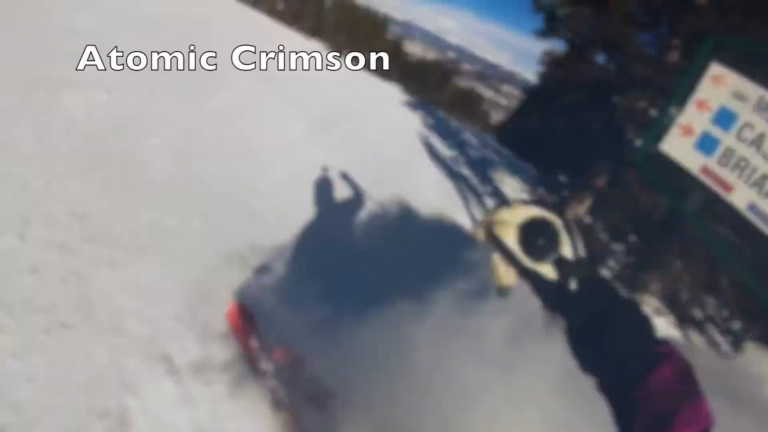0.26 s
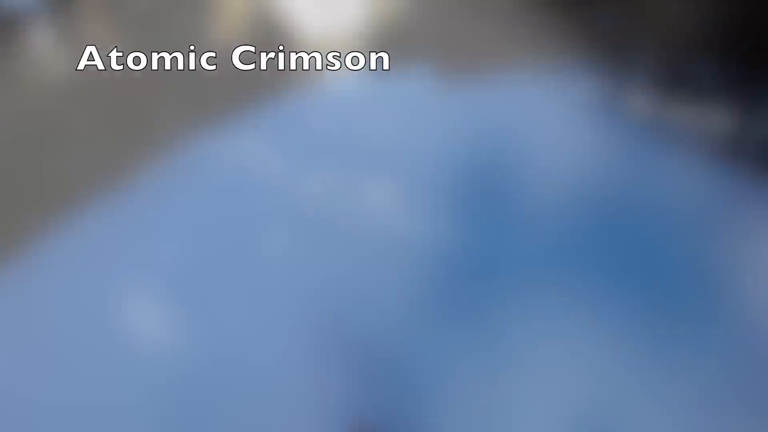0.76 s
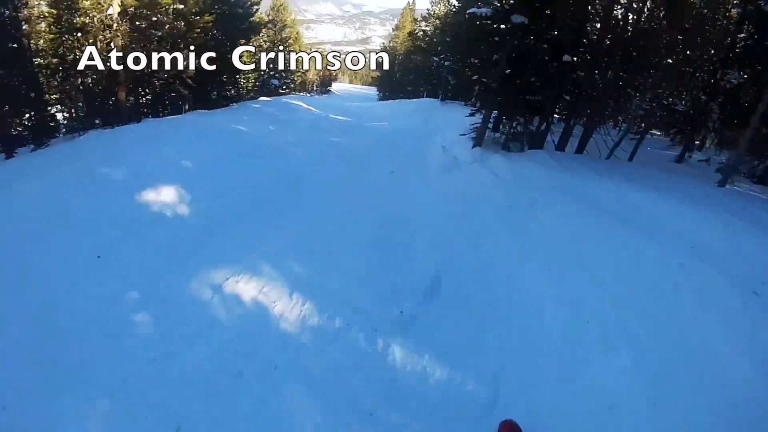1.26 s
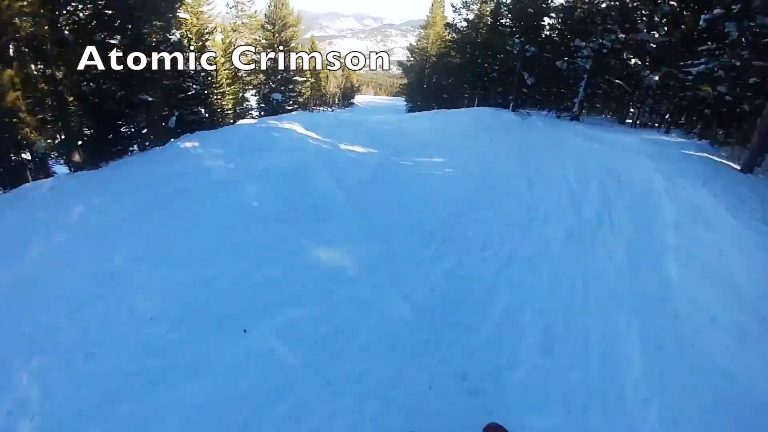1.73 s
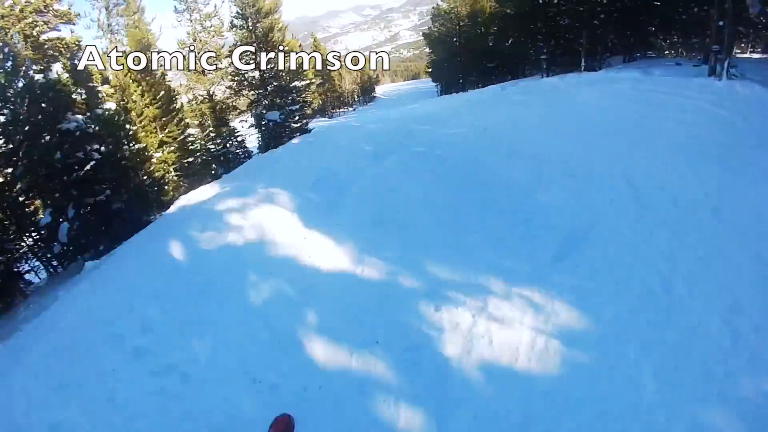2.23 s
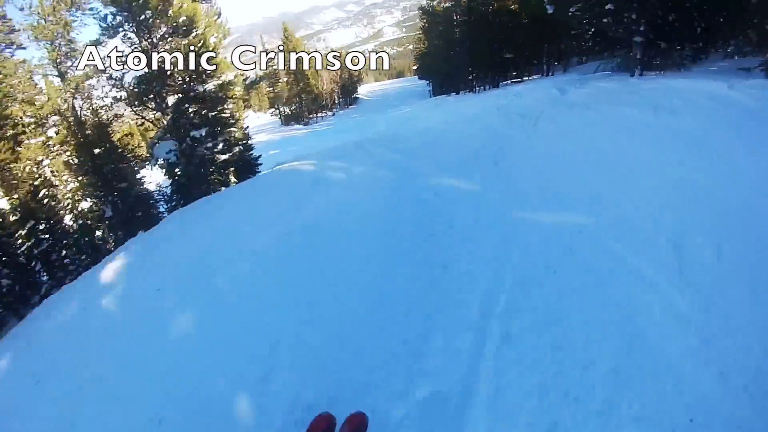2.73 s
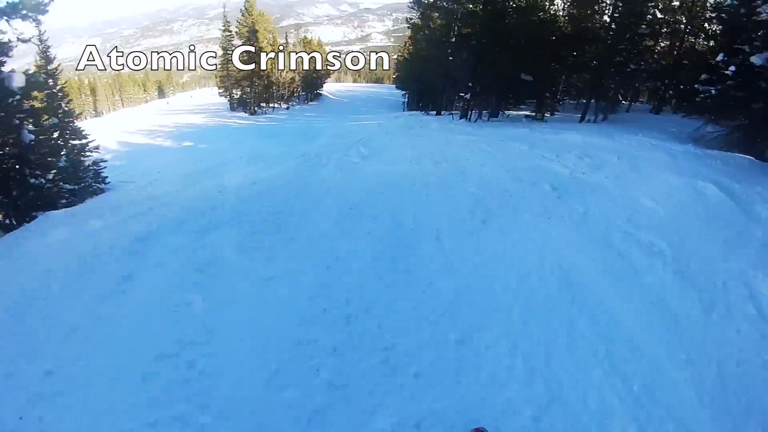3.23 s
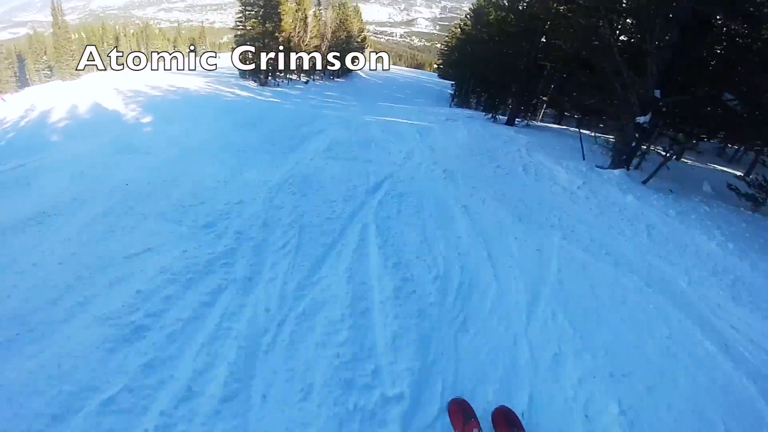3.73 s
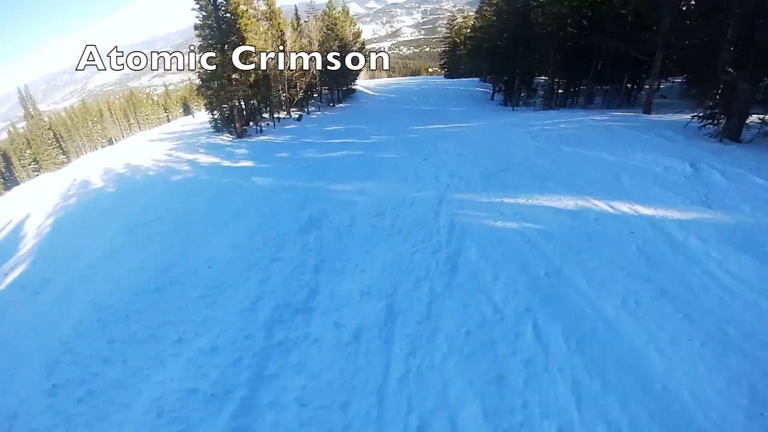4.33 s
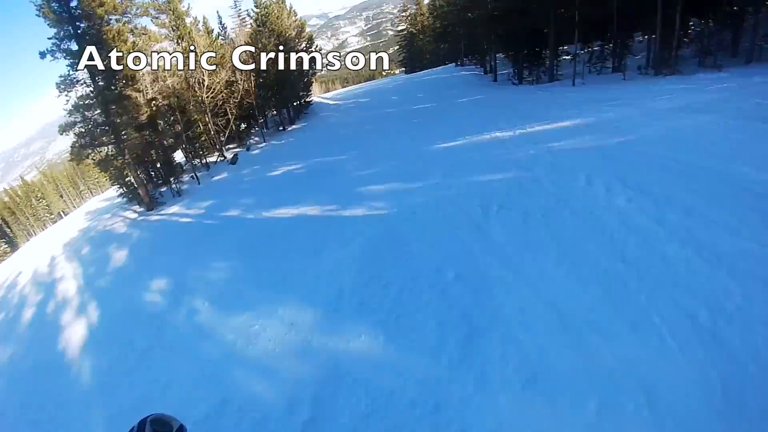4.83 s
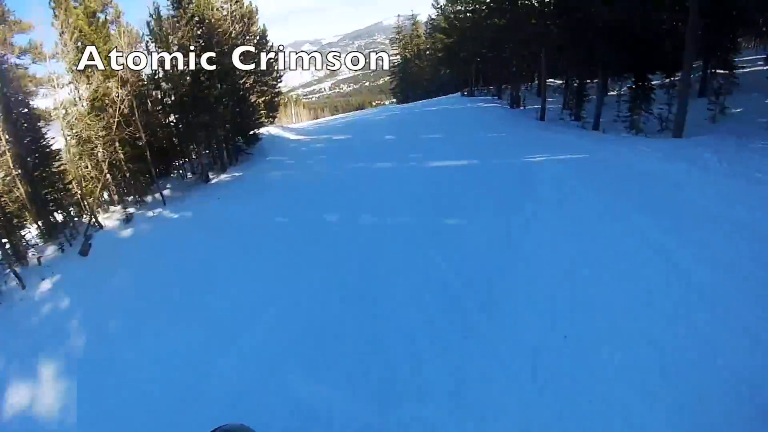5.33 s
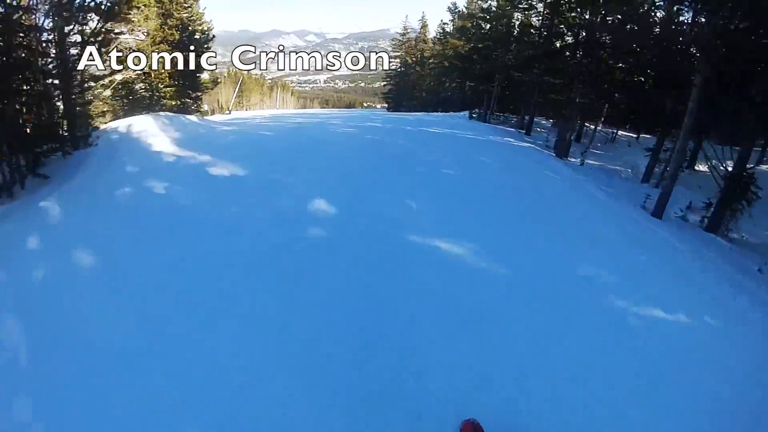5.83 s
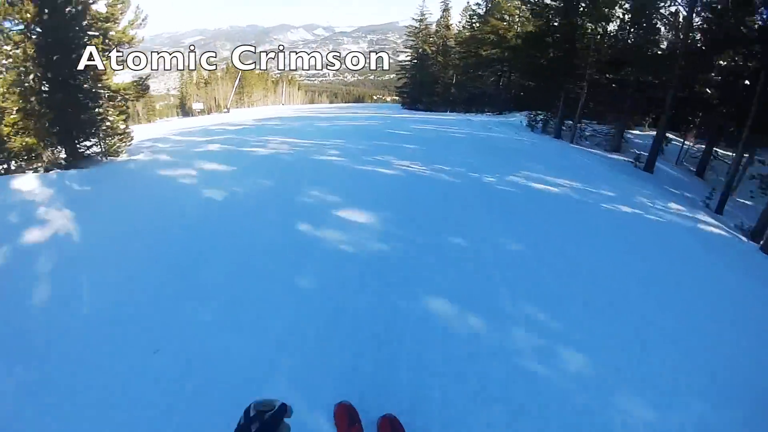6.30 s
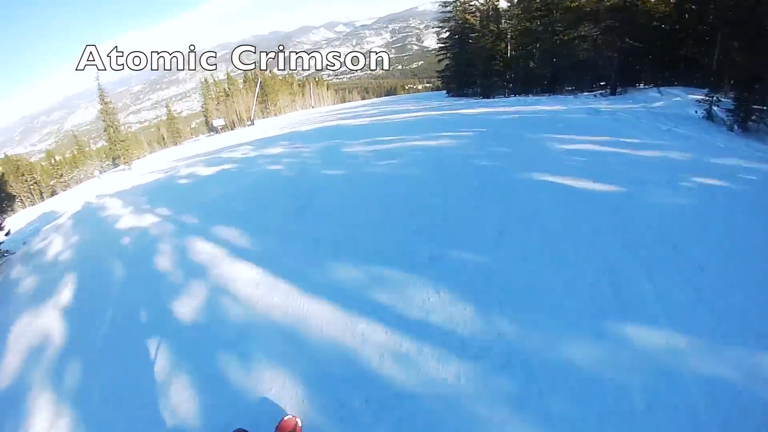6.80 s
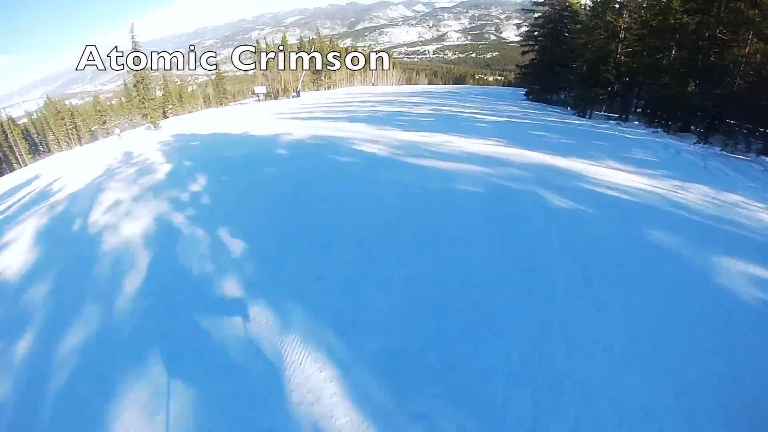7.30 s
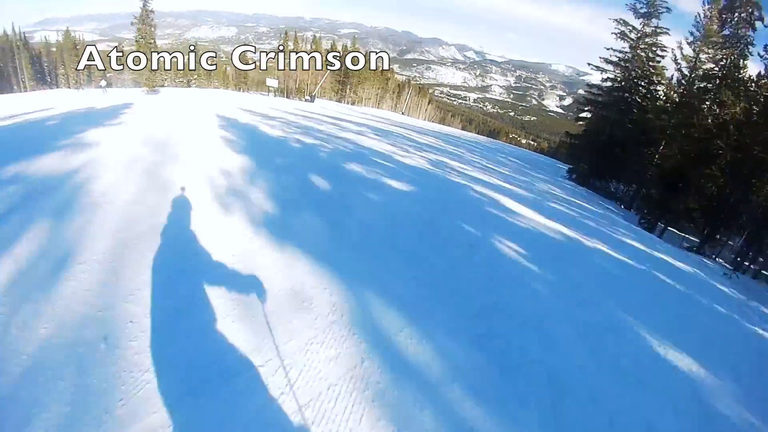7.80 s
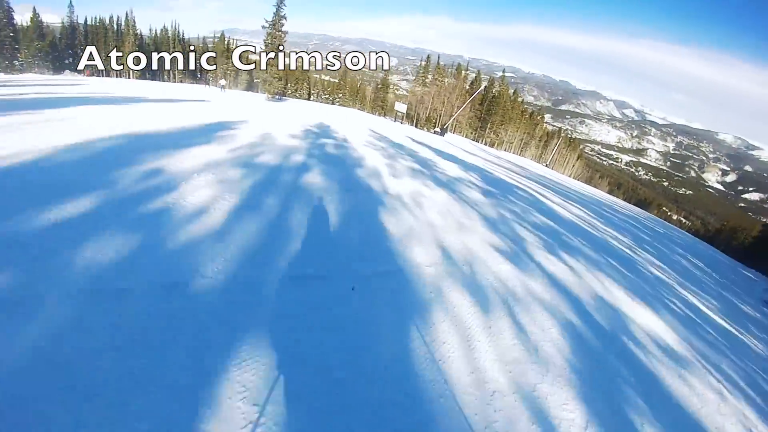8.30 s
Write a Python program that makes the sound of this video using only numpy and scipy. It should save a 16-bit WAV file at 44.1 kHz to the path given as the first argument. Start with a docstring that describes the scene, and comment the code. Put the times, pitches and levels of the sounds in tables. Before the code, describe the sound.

Skis hiss and scrape over packed snow while wind rumbles and flutters on an enclosed camera, with sharp plastic knocks and dull bumps.

```python
"""Skis hiss and bite on packed snow, heard by a camera in a closed plastic housing: coloured noise shaped by
the housing's resonances and driven by the pace of the run. Wind is slow noise that rumbles, flutters and
faintly whistles. Small lumps tap as short ringing thumps. Bumps swing the housing; it knocks in its mount with
clicks and ringing thuds, and plastic snaps; a lone tap sounds late in the run. Loud peaks push the recorder's
limiter down for a moment; a faint background noise lies under it all."""
import sys
import numpy as np
from scipy import signal
from scipy.fft import rfft, irfft
from scipy.io import wavfile

SR = 44100
rng = np.random.default_rng(int(sys.argv[2]) if len(sys.argv) > 2 else 0)


def materialize(psi):
    """Save the field psi as 16-bit PCM at rate SR to the path in sys.argv[1].

    A 1-D psi becomes a single channel; in a 2-D psi each row is a channel.
    """
    bounded = np.clip(np.atleast_2d(psi).T, -1, 1)
    quanta = np.round(bounded * 32767).astype(np.int16)
    wavfile.write(sys.argv[1], SR, quanta)


N = 377055
TIME = np.arange(N) / SR  # seconds
BIN_HZ = np.maximum(np.arange(N // 2 + 1) * SR / N, 1)  # frequencies of the spectrum


def from_db(db):
    """Turn decibels into a gain."""
    return 10 ** (np.asarray(db) / 20)


def colour(points):
    """Draw a spectrum in dB through a few points, straight on a log frequency scale."""
    hz, db = np.transpose(points)
    return np.interp(np.log(BIN_HZ), np.log(hz), db)


def noise(gain, band=slice(None)):
    """Filter white noise to the given spectrum, with rms 1 inside the band."""
    power = np.sum(gain[band] ** 2) / len(gain)
    spectrum = rfft(rng.standard_normal(N)) * gain / np.sqrt(power)
    return irfft(spectrum, N)


def drift(rate_hz):
    """Wander at random around zero with rms 1, mostly slower than the given rate."""
    return noise(1 / (1 + (BIN_HZ / rate_hz) ** 2))


def ring(force, hz, t60):
    """Let a force strike a resonance: a unit click starts a sine of height 1 that dies 60 dB in t60 s."""
    radius = from_db(-60 / (t60 * SR))
    angle = 2 * np.pi * hz / SR
    # the tiny offset keeps the filter from running on vanishing numbers
    return signal.lfilter([0, np.sin(angle)], [1, -2 * radius * np.cos(angle), radius ** 2], force + 1e-18)


def clicks(times, db):
    """Place one-sample clicks of the given heights."""
    out = np.zeros(N)
    out[(np.asarray(times) * SR).astype(int)] = from_db(db)
    return out


def swing(s, hz):
    """Make one quick swing out and back, of height 1 at time s."""
    phase = np.minimum((np.pi * hz * (TIME - s)) ** 2, 50)
    return (1 - 2 * phase) * np.exp(-phase)


def swells(rows):
    """Add smooth rises and falls, each given by its middle, length and height."""
    total = np.zeros(N)
    for s, length, height in rows:
        total += height * np.cos(np.pi * np.clip((TIME - s) / length, -.5, .5)) ** 2
    return total


# pace of the run, which drives skis, wind and lumps: (time [s], level [dB above cruising])
PACE = [(0, -14), (0.45, -16.5), (0.8, -8), (1.1, 0), (1.5, -1), (1.9, -0.5), (2.47, 4), (2.65, 1),
        (3.55, 2.5), (4.05, 1), (4.55, 3.5), (5.3, 3), (5.65, -0.94), (6.52, -4.5), (6.85, 1.2), (8.2, -3),
        (8.55, -1)]


def pace_of_run():
    """Join the pace points by straight lines; each source follows them in its own measure."""
    s, db = np.transpose(PACE)
    return np.interp(TIME, s, db)


# colour of the faint background noise: (frequency [Hz], relative level [dB per Hz])
BACKGROUND_COLOUR = [(20, 6), (125, -15), (500, -20.5), (2000, -34), (8000, -35), (15000, -20.5)]


def background_noise(level_db=-67.5):
    """Make a faint background noise, drawn separately for each channel."""
    pair = np.array([noise(from_db(colour(BACKGROUND_COLOUR))) for channel in range(2)])
    return from_db(level_db) * pair


SWAY_DB, SWAY_S = -17, 0.11  # rumble around a bump of 0 dB; time over which it builds and dies


def sway():
    """Build and let die the camera's swaying around every jolt and knock, adding their powers."""
    power = np.zeros(N)
    for s, db, *_ in JOLTS + KNOCKS:
        power += from_db(db) ** 2 * np.exp(-2 * np.abs(TIME - s) / SWAY_S)
    return np.sqrt(power)


# colour of the deep wind rumble: (frequency [Hz], relative level [dB per Hz])
RUMBLE_COLOUR = [(8, -5.5), (18, 0), (35, -2.5), (55, -5), (80, -15), (120, -20), (250, -40.5),
                 (600, -74.5)]
# colour of the flutter of the shaken housing: (frequency [Hz], relative level [dB per Hz])
FLUTTER_COLOUR = [(40, -11.5), (90, -18), (140, -1), (195, 3.5), (250, -5.5), (330, -20), (430, -25.5),
                  (700, -35), (2000, -88)]
# gusts and lulls in the headwind: (middle time [s], length [s], change of rumble level [dB])
GUSTS = [(.6, 0.47, 3), (3.22, 0.21, 3.5), (4.2, 0.84, -2.5), (6.2, 1.36, -0.5), (6.95, 0.48, 5),
         (7.3, 0.44, -4.5), (8.55, 0.64, 4.5)]
# swell of the faint edge whistle: (middle time [s], length [s], added level [dB])
WHISTLE_SWELL = [(7.66, 1, 18)]
# levels at cruising pace, before gusts; FOLLOWS is dB per dB of pace
RUMBLE_DB, RUMBLE_FOLLOWS = -25, 0.76
FLUTTER_DB, FLUTTER_FOLLOWS = -36.5, 1
FLUTTER_SHARE = 0.28  # part of each gust that the flutter takes up
WHISTLE_DB, WHISTLE_HZ, WHISTLE_WIDTH_HZ = -70.5, 839, 12


def wind(gust_db=2.0, lumpy_db=0.5):
    """Eddies press on the housing, shake it on its mount and whistle faintly at an edge."""
    pace = pace_of_run()
    gusts = swells(GUSTS)
    quick_gusts = gust_db * drift(15.0)

    air_rumble = from_db(RUMBLE_DB + RUMBLE_FOLLOWS * pace + gusts)
    rumble_level = np.hypot(air_rumble, from_db(SWAY_DB) * sway())
    rumble = noise(from_db(colour(RUMBLE_COLOUR))) * rumble_level * from_db(quick_gusts)

    flutter_db = FLUTTER_DB + FLUTTER_FOLLOWS * pace + FLUTTER_SHARE * gusts
    flutter_db = flutter_db + quick_gusts + lumpy_db * drift(30)
    flutter = noise(from_db(colour(FLUTTER_COLOUR))) * from_db(flutter_db)

    narrow = 1 / (1 + ((BIN_HZ - WHISTLE_HZ) / WHISTLE_WIDTH_HZ) ** 2)
    whistle = noise(narrow) * from_db(WHISTLE_DB + pace + swells(WHISTLE_SWELL))
    return rumble + flutter + whistle


LUMPS_PER_S, LUMP_SPREAD_DB = 22, 3.5
LUMP_DB, LUMP_FOLLOWS = -34.5, 1.5  # click level at cruising pace; dB per dB of pace
# what a lump sets ringing: (frequency [Hz], level [dB], time to fall 60 dB [s])
LUMP_MODES = [(116.4, 0.5, 0.046), (220, -1.5, 0.024), (492, -20, 0.055)]
# stretches of chopped snow: (middle time [s], length [s], added level of the lumps [dB])
ROUGH_SNOW = [(2.25, 1.5, 11), (4.85, 1.7, 1)]


def lumps():
    """Lumps of snow tap the skis at random and reach the mount as soft thumps, stronger at speed."""
    times = TIME[rng.random(N) < LUMPS_PER_S / SR]
    level = LUMP_DB + LUMP_FOLLOWS * pace_of_run() + swells(ROUGH_SNOW)
    chance = np.clip(rng.standard_normal(len(times)), -2, 2)
    size_db = np.interp(times, TIME, level) + LUMP_SPREAD_DB * chance
    soften = signal.butter(2, 700, fs=SR, output="sos")
    force = signal.sosfilt(soften, clicks(times, size_db))
    return sum(from_db(db) * ring(force, hz, t60) for hz, db, t60 in LUMP_MODES)


# soft jolts from bumps in the slope: (time [s], peak level [dB])
JOLTS = [(1.491, -15), (1.552, -5.5), (1.777, 2), (2.342, -2.5), (2.496, 2), (2.833, -7), (2.897, -11),
         (3.134, -10), (3.702, -5.5), (4.183, -5), (4.599, -5), (4.685, -0.5), (5.244, -2.5), (5.438, 0.5)]
JOLT_HZ = 55
LEAD_S, LEAD_HZ, LEAD_DB = .011, 71.2, -12  # swing before each knock; dB relative to its tabled thud


def jolts():
    """A bump swings the housing once out and back; a like swing leads into every knock."""
    soft = sum(from_db(db) * swing(s, JOLT_HZ) for s, db in JOLTS)
    leading = sum(from_db(thud + LEAD_DB) * swing(s - LEAD_S, LEAD_HZ) for s, thud, _ in KNOCKS)
    return -(soft + leading)


# the housing hits the end of its play: (time [s], thud level [dB], click level [dB]), before the trims
KNOCKS = [(0.0627, 2, -15), (0.172, -1.5, -19), (.274, -0.5, -19.5), (.388, -8.5, -28), (0.79, -22, -57),
          (1.578, 2, -15), (1.703, 3, -18.5), (1.8, -0.5, -44), (1.936, -4, -26), (2.348, -0.5, -25),
          (2.627, -15.5, -38), (2.724, -8, -34), (3.701, -11, -27), (3.927, -12, -42), (4.176, -15, -31),
          (4.509, -3, -25.5), (4.691, 1.5, -26), (5.2918, 9, -7), (5.421, -7, -24), (5.5, -2, -24),
          (6.4002, -7.5, -30.5)]
# ringing of the housing on its mount: (frequency [Hz], level [dB], time to fall 60 dB [s])
MOUNT_MODES = [(201, 0, 0.047), (50.6, -14.5, 0.17)]
# ringing of the housing's shell: (frequency [Hz], level [dB], time to fall 60 dB [s])
SHELL_MODES = [(494, -8, 0.031), (1304, -3, 0.021), (2038, 1.5, 0.01), (2608, -8.5, 0.014),
               (4730, -17.5, 0.0036), (6800, -27, 0.0011)]
THUD_TRIM_DB, CLICK_TRIM_DB = -1.5, -2.0
THUD_HZ, STIFFEN_HZ_PER_DB = 180, 3  # rebound for a tabled thud of 0 dB; harder knocks rebound faster


def knocks(rebound_s=0.0031, grit_t60=0.019, grit=0.091):
    """The mount stops the housing: a gritty click in the shell, then a padded rebound that rings on."""
    s, thud, click = np.transpose(KNOCKS)
    push = np.zeros(N)
    for at, db in zip(s, thud):
        push -= from_db(db + THUD_TRIM_DB) * swing(at + rebound_s, THUD_HZ + STIFFEN_HZ_PER_DB * db)
    # the push, summed over its length, sets the mount ringing
    drive = push * np.pi * THUD_HZ / SR
    body = push + sum(from_db(db) * ring(drive, hz, t60) for hz, db, t60 in MOUNT_MODES)

    touch = clicks(s, click + CLICK_TRIM_DB)
    # each click leaves a dying tail of rough noise
    rub = signal.lfilter([1], [1, -from_db(-60 / (grit_t60 * SR))], touch + 1e-18)
    force = touch + grit * rub * rng.standard_normal(N)
    shell = np.zeros(N)
    for k, (hz, db, t60) in enumerate(SHELL_MODES):
        shell += (-1) ** k * from_db(db) * ring(force, hz, t60)  # neighbours start in opposite directions
    return body + shell


RATTLE_S, RATTLE_HZ, RATTLE_T60_S = .0295, 3200, 0.014  # delay after the knock, pitch, decay
# level after the hardest click, before the band filter; dB per dB of click
RATTLE_DB, RATTLE_GROWTH = -10, 2.06


def rattles():
    """A knock lifts the latch, which falls back a moment later; rows as for the snaps."""
    s, _, click = np.transpose(KNOCKS)
    levels = RATTLE_DB + RATTLE_GROWTH * (click - click.max())
    return [(at + RATTLE_S, db, RATTLE_HZ, RATTLE_T60_S) for at, db in zip(s, levels)]


# short snaps of plastic, some alone, some sounding with a knock, and one lone tap late in the run: # (time [s],
# level before the band filter [dB], centre frequency [Hz], time to fall 60 dB [s])
SNAPS = [(.049, -19, 1830, 0.0081), (0.258, -26.5, 1880, .02), (0.347, -36, 3460, 0.0082),
         (1.549, -24, 1690, .026), (1.799, -4, 1600, 0.024), (1.812, -12, 1880, 0.0096),
         (8.367, -16.5, 1450, 0.034)]


def snaps(spread=1.32):
    """Plastic snaps and a lone tap: brief bursts of noise, each filtered to its own range of pitch."""
    out = np.zeros(N)
    white = rng.standard_normal(N)
    for s, db, hz, t60 in SNAPS + rattles():
        age = TIME - s
        fading = from_db(db - 60 * np.clip(age / t60, 0, 3))
        burst = white * (age >= 0) * fading
        band = signal.butter(2, [hz / spread, hz * spread], "band", fs=SR, output="sos")
        out += signal.sosfilt(band, burst)
    return out


# colour of the crushed snow: (frequency [Hz], relative level [dB per Hz])
SNOW_COLOUR = [(150, 5.5), (450, -7.5), (750, -7.5), (1050, -4.5), (1300, 2.5), (2000, -0.5), (3100, -11),
               (4000, -21.5), (5400, -19.5), (6200, -22), (7400, -25.5), (8300, -32.5), (10000, -37),
               (15000, -88)]
# housing resonances through which the snow is heard: (frequency [Hz], half width [Hz], lift [dB])
HOUSING = [(840, 29, 4.5), (1521, 121, 7.5), (1988, 163, 7), (2457, 21, 5.5), (2773, 166, 5),
           (3540, 212, 9.5), (4690, 380, 12.5), (6680, 160, 3), (11780, 780, 21)]
# the skis are set on edge and bite: (middle time [s], length [s], added treble [dB])
EDGE_SETS = [(1.2, 0.69, 1.5), (3.35, 2.1, 2.5), (5.05, 0.38, 1), (5.9, 0.31, 3), (8.2, 1.5, 3)]
GLIDE_DB, BITE_DB, BITE_FOLLOWS = -40.5, -53, 1.26  # levels at cruising pace; dB per dB of pace


def skis(split_hz=3000, chatter_db=0.89, crunch_db=0.44, patchy_db=-0.26):
    """Crushed snow hisses; a loaded edge adds treble, and the chattering skis shake both."""
    pace = pace_of_run()
    glide_db = GLIDE_DB + pace
    bite_db = BITE_DB + BITE_FOLLOWS * pace + swells(EDGE_SETS)

    shape_db = colour(SNOW_COLOUR)
    for hz, width, lift in HOUSING:
        shape_db = shape_db + lift * np.exp(-.5 * ((BIN_HZ - hz) / width) ** 2)
    shape = from_db(shape_db)

    # share the power out below and above the split; each level holds in its own band
    dull_share = 1 / (1 + (BIN_HZ / split_hz) ** 6)
    body_band = (BIN_HZ > 1200) & (BIN_HZ < 2400)
    treble_band = (BIN_HZ > 4200) & (BIN_HZ < 7500)
    base = noise(shape * np.sqrt(dull_share), body_band) * from_db(glide_db)
    edge = noise(shape * np.sqrt(1 - dull_share), treble_band) * from_db(bite_db)

    shaking_db = patchy_db * drift(5.4) + chatter_db * drift(16) + crunch_db * drift(660)
    return (base + edge) * from_db(shaking_db)


def scene():
    """Add all sources equally to both channels, over the separately drawn background noise."""
    centre = wind() + lumps() + jolts() + knocks() + snaps() + skis()
    return centre + background_noise()


def record(dry, threshold_db=-7.5, release_db_per_s=78.5, attack_s=0.0033, squeeze=1.138, step_db=0.45):
    """Duck after loud peaks and recover, cut the deepest rumble and the top, and round the peaks."""
    level_db = 20 * np.log10(np.abs(dry).max(axis=0) + 1e-9)
    over = squeeze * np.maximum(level_db - threshold_db, 0)  # dB of ducking per dB above the threshold
    # hold each peak and let it fall at a steady rate
    recovery = release_db_per_s * TIME
    held = np.maximum.accumulate(over + recovery) - recovery
    pole = np.exp(-1 / (attack_s * SR))
    duck = signal.lfilter([1 - pole], [1, -pole], held)
    # the gain moves in small steps, which crackle faintly on big slow swings
    limited = dry * from_db(-step_db * np.round(duck / step_db))

    lean = signal.sosfilt(signal.butter(1, 22, "high", fs=SR, output="sos"), limited)
    lean = signal.sosfilt(signal.butter(2, 13000, fs=SR, output="sos"), lean)
    rounded = lean / (1 + lean ** 8) ** (1 / 8)
    steep_cut = signal.ellip(10, .1, 80, 15200, fs=SR, output="sos")  # removes what lies above 15.2 kHz
    return signal.sosfilt(steep_cut, rounded)


dry = scene()
out = record(dry)
materialize(out)
```